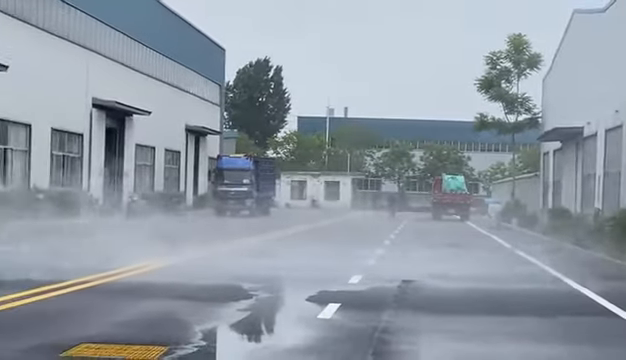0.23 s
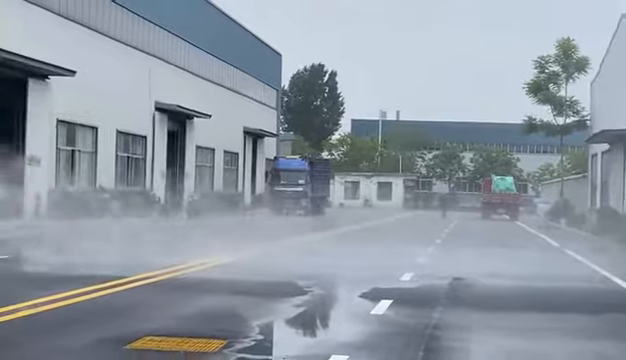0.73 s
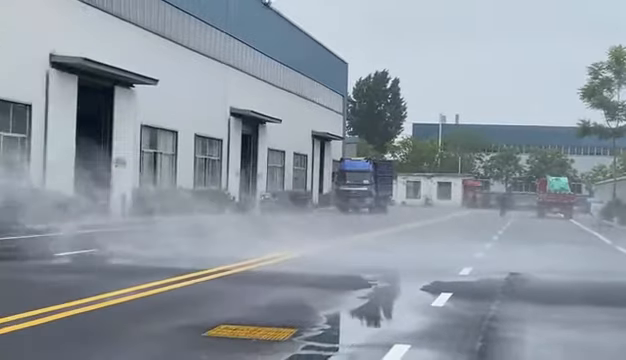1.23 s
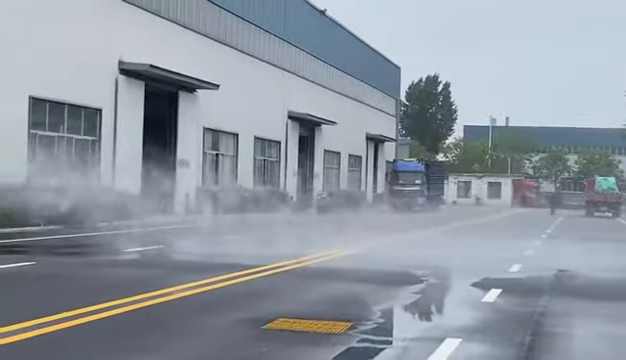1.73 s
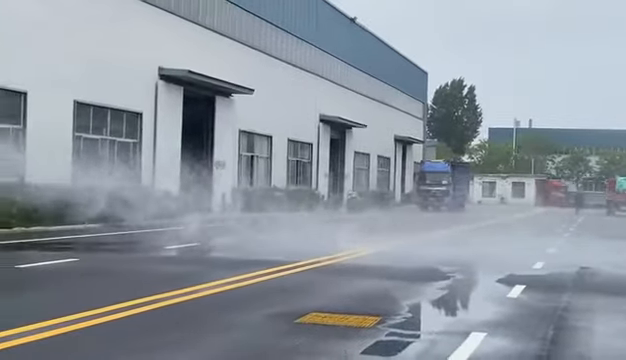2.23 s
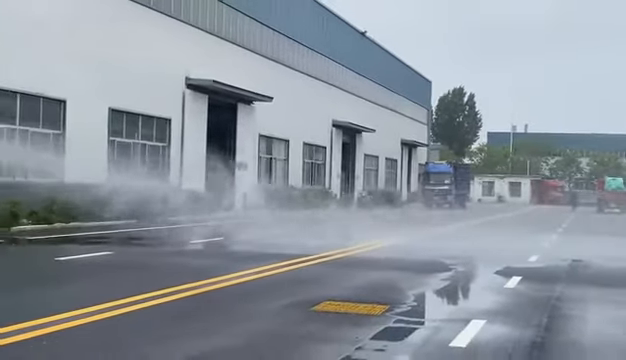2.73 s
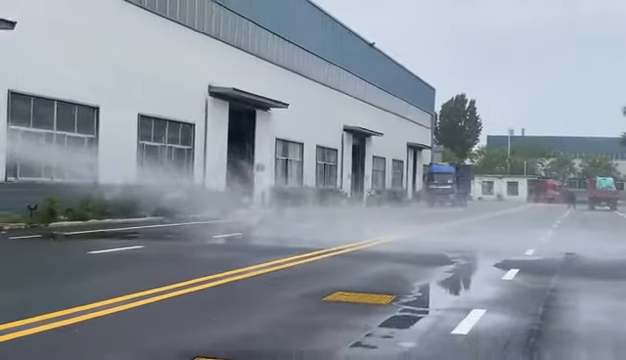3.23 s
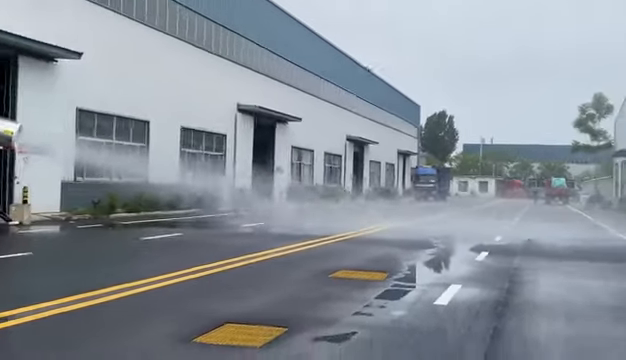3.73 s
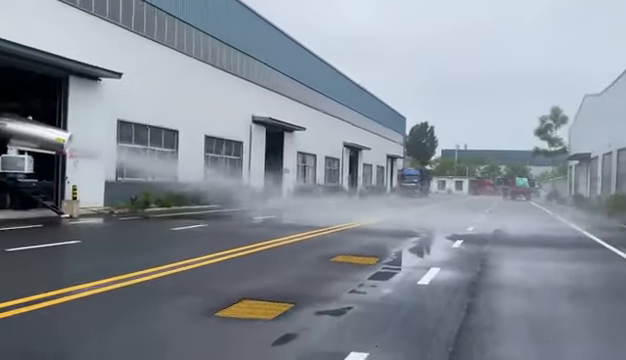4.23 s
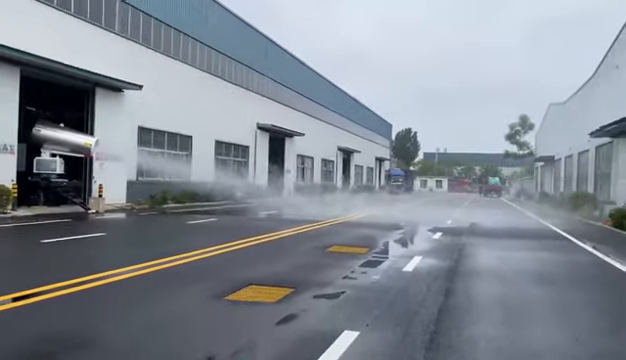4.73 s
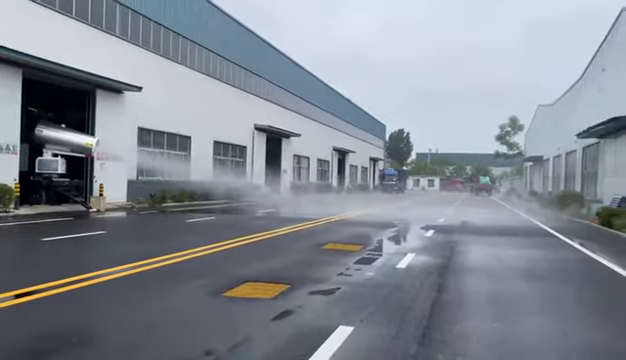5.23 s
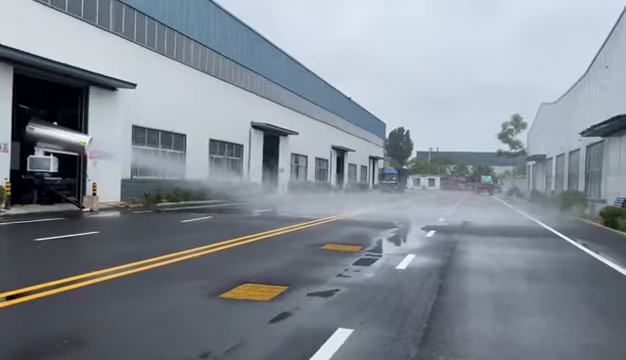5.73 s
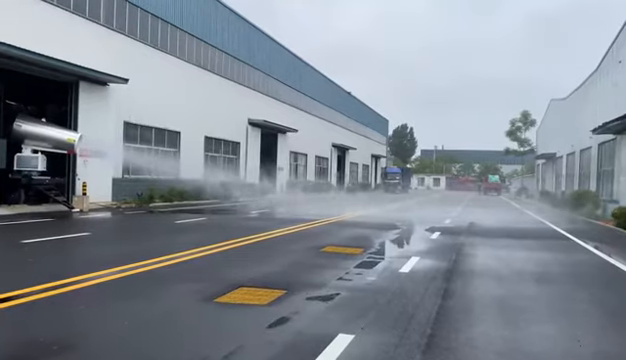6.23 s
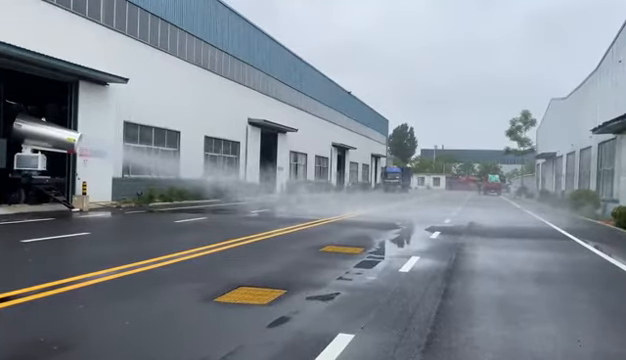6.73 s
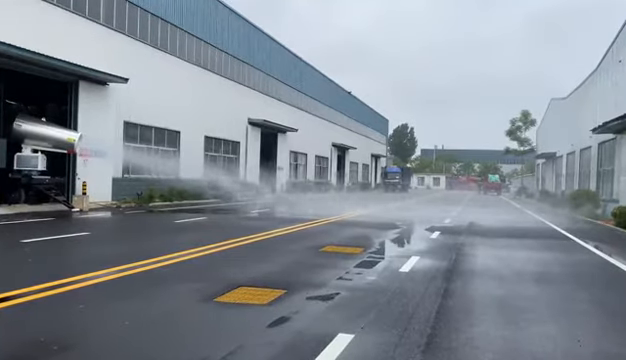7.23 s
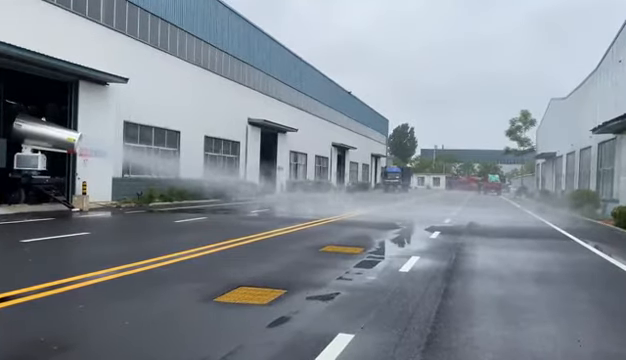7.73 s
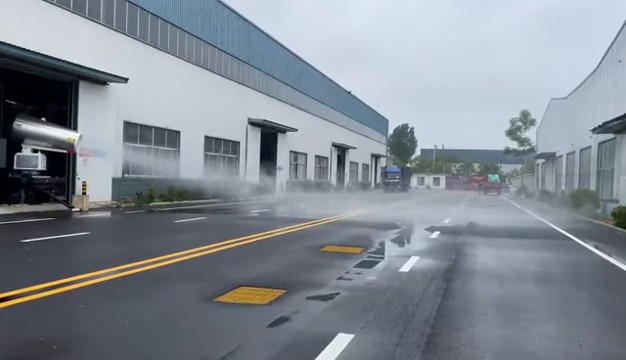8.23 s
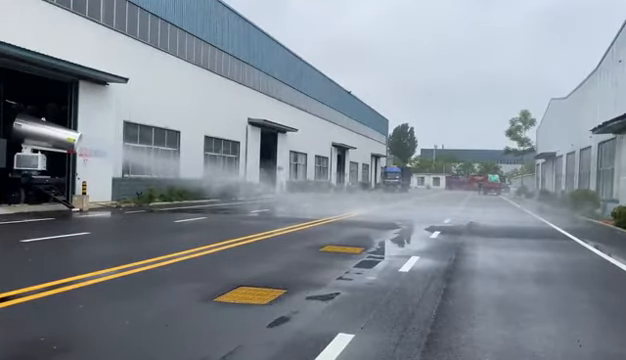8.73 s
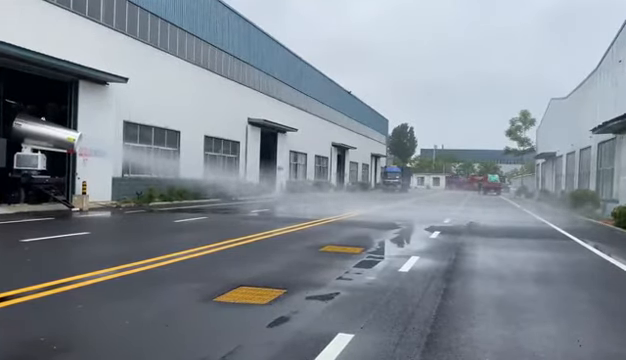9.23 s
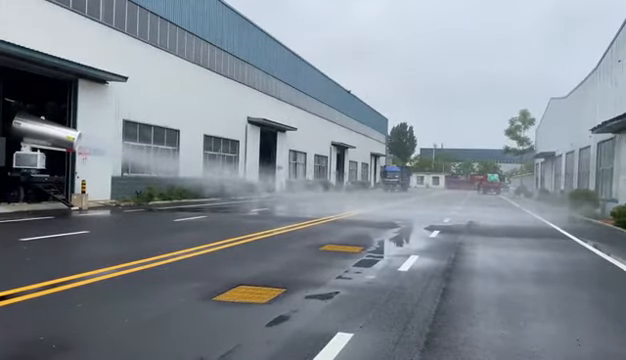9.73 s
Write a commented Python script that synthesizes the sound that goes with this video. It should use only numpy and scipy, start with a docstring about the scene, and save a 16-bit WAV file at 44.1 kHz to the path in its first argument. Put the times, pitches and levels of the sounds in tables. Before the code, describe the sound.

Constant low fan hum with rumbling casing and hissing spray outdoors, gusty breeze at first, faint high whine flickering, then a wider, brighter rush.

```python
"""A mist cannon runs in a workshop doorway and blows spray down a wet factory street.
Its fan hums as a blade tone with overtones over a rumble; shaped noise makes the air rush and nozzle hiss.
Steady tones make the drive's drone and a thin whine that comes and goes; low noise makes a gusty breeze.
Near four seconds the microphone turns toward the machine: the sound widens and the treble starts to
flicker, because the recorder's noise suppressor ducks weak patches."""
import sys
import numpy as np
from scipy import signal
from scipy.fft import irfft
from scipy.io import wavfile
from scipy.ndimage import uniform_filter1d

SR = 44100
rng = np.random.default_rng(int(sys.argv[2]) if len(sys.argv) > 2 else 0)


def to_wav(s):
    """Save 16-bit WAV."""
    ch = np.atleast_2d(s).T  # columns
    pcm = np.round(np.clip(ch, -1, 1) * 32767)  # PCM
    wavfile.write(sys.argv[1], SR, pcm.astype(np.int16))


N = 440559
T = np.arange(N) / SR  # time of each sample [s]
BINS = np.maximum(np.arange(N // 2 + 1) * SR / N, 1)  # frequencies of the whole-length spectrum [Hz]
SIDES = np.array([[1], [-1]])  # left, right

# Blade tone, which swells and fades on its way through moving air: (time [s], level [dB])
BLADE_LEVEL = [(0, -26.5), (.65, -28), (1.1, -28), (1.5, -23.5), (1.7, -35.5), (1.87, -31.5), (2.05, -30),
               (2.4, -18.5), (2.58, -24), (3.25, -22.5), (3.95, -27), (4.22, -23.5), (4.6, -26),
               (4.87, -22), (4.95, -40), (5.03, -22.5), (5.3, -32.5), (5.4, -27), (5.62, -34.5),
               (5.72, -29), (6.26, -26.5), (6.35, -37.5), (6.5, -23.5), (7.02, -46.5), (7.17, -25.5),
               (7.46, -25.5), (7.56, -33.5), (7.9, -30), (9.15, -37.5), (9.74, -33.5), (10, -27.5)]
# Other overtones of the blade rate: (multiple [count], level turned away [dB], gain from the front [dB],
# left lead turned away [rad], left lead from the front [rad], left minus right [dB])
BLADE_OVERTONES = [(2, -38, 3, 2.13, 2.5, -0.5), (3, -43, 2, 0.75, -1.5, -5), (4, -39.5, -2, 1.4, 3.5, 1.5),
                   (8, -51.5, 1, 2.7, 5.5, -2)]
# Fainter steady tones of the machinery: (frequency [Hz], level [dB])
MACHINE_TONES = [(230.1, -46.5), (263.7, -48.5), (592.2, -45.5), (5952.6, -64), (6209.6, -68.5),
                 (6725.1, -53.5)]
# Colours of the casing's rumble, the air rush and the nozzles' hiss: (frequency [Hz], relative level [dB])
RUMBLE_COLOUR = [(20, -24), (45, -17.5), (75, -3), (110, -6), (126, -3.5), (150, 0.5), (195, 0),
                 (212, -3.5), (235, 0), (252, -1.5), (275, 1.3), (305, -8), (335, -3), (380, -18.5),
                 (600, -28)]
RUSH_COLOUR = [(250, -19), (380, -1.5), (450, 0.5), (520, 3.5), (570, -2.5), (720, -4.5), (920, -5),
               (1100, -3), (1550, -5.5), (1950, -7), (2250, -12), (3300, -41)]
HISS_COLOUR = [(1700, -10), (2500, 0.5), (3100, 0.5), (4050, -0.5), (4450, -3.5), (5200, -2), (6300, -1.5),
               (7500, -5.5)]
# Brief surges of the spray: (time [s], half width [s], rise [dB])
SPRAY_SURGES = [(0.1, 0.26, 1), (5.659, 0.31, 1), (6.503, 0.27, 1), (7.76, 0.23, 1.5), (8.061, 0.22, 0.3),
                (8.79, 0.098, 0.3)]
# Brief dips of the hiss: (time [s], half width [s])
HISS_DIPS = [(4.39, 0.0097), (4.757, .018), (4.855, 0.0089), (5.229, 0.017), (5.387, 0.017), (5.479, 0.011),
             (5.644, 0.014), (6.389, 0.013), (6.634, 0.0067), (7.153, 0.0077), (7.474, 0.0077),
             (7.888, 0.019), (8.182, 0.015), (8.904, 0.017), (9.166, 0.018), (9.31, 0.014), (9.52, .014),
             (9.66, 0.014)]
# Bursts of the thin whine: (start [s], end [s], level turned away [dB])
WHINE_BURSTS = [(2.1, 2.15, -43), (2.33, 2.42, -48), (2.54, 2.64, -45), (2.68, 2.82, -40.5),
                (2.91, 2.97, -38), (2.97, 3.21, -40.5), (3.27, 3.31, -41), (3.38, 3.56, -39.5),
                (3.56, 3.68, -47), (4.8, 5.0, -51), (6.35, 6.68, -50), (6.68, 6.85, -45.5), (7.2, 7.5, -49)]
# Gusts of the breeze: (time [s], half width [s], rise [dB])
BREEZE_GUSTS = [(.04, 0.022, 4.5), (.22, 0.027, 5.5), (.54, .025, 3.5), (.69, .04, 4), (0.919, 0.033, 10.5),
                (1.081, 0.039, 7), (1.4, .1, 1), (1.56, 0.019, 5.5), (1.67, .045, 9.5), (1.771, 0.069, 4)]
# How far the microphone faces the machine: (time [s], share [0-1])
MIC_TURN = [(3.55, 0), (4.2, 1)]
# The two microphone ports, turned away from, nearly toward and squarely toward the machine:
# (frequency [Hz], likeness of the ports [0-1], left lead [rad], left minus right [dB])
VIEW_AWAY = [(50, .8, 0, 0), (130, .91, 0, .4), (280, .94, 0, -.6), (430, .7, .3, 1.4), (590, .78, 0, 1),
             (750, .5, -.2, -.4), (920, .65, .2, .5), (1200, .47, .9, 2.6), (1550, .6, .7, 1.8),
             (2000, .49, 2, -2.2), (2650, .55, .7, 2.2), (3100, .88, 0, .3), (3800, .94, 0, 0),
             (4400, .64, .1, 0), (5400, .8, 0, 0)]
VIEW_ANGLED = [(280, .85, 0, -.6), (450, .3, .6, 2), (600, .42, -.3, 1.8), (720, .12, -.5, .4),
               (930, .2, 1.5, 1.2), (1100, .4, 2.2, 2), (1280, .15, 1.6, 4.4), (1430, .5, .2, 3),
               (1600, .45, .7, 2.6), (1800, .6, 2.7, 0), (2000, .3, 2.4, 0), (2500, .5, 2.7, -1)]
VIEW_FACING = [(50, .7, 0, 0), (140, .85, -.2, .5), (280, .82, 0, -.6), (450, .45, .3, 2),
               (570, .38, 0, 1.8), (720, .1, .5, .4), (830, .35, 3, .8), (900, .75, 3.1, .6),
               (970, .77, 3.1, .8), (1130, .34, 2.2, 3), (1250, .38, 2.5, 4.4), (1550, .38, 2, 2.6),
               (1780, .5, 2.7, 1), (2000, .55, 3, 0), (2370, .2, 2.5, -.5), (2600, .45, 2.3, -1.1),
               (2850, .45, 3.1, -1), (3150, .2, 1.8, 0), (3500, .14, 1.9, 0), (4500, .27, 4.4, 1.1),
               (5400, .2, 3.8, 1.5), (6500, .37, 6, .2), (7200, .28, 5.1, .3)]
# Change of noise colour when nearly and when squarely facing the machine: (frequency [Hz], lift [dB])
ANGLED_LIFT = [(150, 1), (250, 0), (350, 2), (500, -0.5), (720, 2.5), (1200, 4.5), (2000, 3)]
FACING_LIFT = [(80, 0.5), (180, -0.5), (270, -2), (360, 0.5), (530, 1.9), (720, 4.5), (930, 5.5),
               (1200, 3.5), (2000, 3), (3700, 1), (4450, 2), (5300, 0), (7000, 1)]
# Deepest narrow cut of the noise suppressor, at its full bite: (frequency [Hz], cut [dB])
SUPPRESSOR_CUT = [(450, 0), (750, 9), (870, 58), (980, 58), (1100, 17), (1500, 22), (2050, 56), (3000, 36),
                  (4200, 25), (7000, 15)]

BLADE_HZ, DRIVE_HZ, WHINE_HZ = 257.5, 131.8, 5437

# One overtone stands out as a clear note and swells once.
NOTE_MULTIPLE = 6
NOTE_DB, NOTE_SWELL_DB, NOTE_SWELL_S, NOTE_WIDTH_S = -40, 3.5, 5.1, 1
# A second, small turn settles the microphone: the note shifts left and the rush turns hollow.
SETTLE_S, SETTLE_LENGTH_S = 5.8, 0.27
NOTE_LEAD_RAD, NOTE_PAN_DB = 0.93, -2  # before that turn
NOTE_SHIFT_RAD, NOTE_SHIFT_DB = 0.57, 8

# Jet: levels turned away, gains from the front, and the spread and speed of quick wavering.
RUSH_DB, RUSH_FRONT_DB = -27, 1.43
HISS_DB, HISS_FRONT_DB = -31.5, 2.16
FLUTTER_DB, FLUTTER_PER_S = 0.36, 27
SPUTTER_DB, SPUTTER_PER_S = 0.21, 16.3  # of the hiss, heard from the front
DIP_DB = -1
SAG_S, SAG_WIDTH_S, SAG_DB = 3.75, 0.29, -1  # the hiss also sags a little early in the turn

# Whine: the faint level between bursts, and a slight drop from the front.
WHINE_DB, WHINE_FRONT_DB = -57, -0.5
WHINE_LEAD_RAD, WHINE_PAN_DB = 0.56, 6.5  # toward the left, heard from the front
WHINE_EDGE_S = 0.015  # how long a burst takes to cut in or out

BREEZE_DB, BREEZE_DROPS_S, BREEZE_FALL_DB_PER_S, LULL_DB = -29.5, 1.7, 14, -43.5

TOP_HZ = 7640  # the recorder keeps nothing much above this


def fan(facing, settled):
    """Turning blades beat the air into a tone with overtones, one a clear note, and the casing rumbles."""
    lead, pan_db = place(BLADE_HZ, facing)
    hum = undb(curve(BLADE_LEVEL)[0]) * tone(BLADE_HZ, lead, pan_db, scatter=0.026, rate=2.3)

    overtones = 0
    for multiple, db, front_db, lead_away, lead_front, pan_db in BLADE_OVERTONES:
        lead = lead_away + facing * (lead_front - lead_away)
        overtone = tone(round(multiple) * BLADE_HZ, lead, pan_db, scatter=0.57, rate=7)
        overtones = overtones + undb(db + front_db * facing) * overtone

    note_db = NOTE_DB + NOTE_SWELL_DB * swell(NOTE_SWELL_S, NOTE_WIDTH_S)
    note_lead = NOTE_LEAD_RAD + NOTE_SHIFT_RAD * settled
    note_pan_db = NOTE_PAN_DB + NOTE_SHIFT_DB * settled
    note = undb(note_db) * tone(NOTE_MULTIPLE * BLADE_HZ, note_lead, note_pan_db, scatter=0.21, rate=26)

    rumble = undb(-26.0 + .5 * walk(1.2)) * air(RUMBLE_COLOUR, turning(facing, settled))
    return hum + overtones + note + rumble


def jet(facing, settled):
    """Air rushes from the barrel and carries the hiss of water atomised by the nozzles."""
    rush_db = RUSH_DB + RUSH_FRONT_DB * facing + FLUTTER_DB * walk(FLUTTER_PER_S)
    rush = undb(rush_db) * air(RUSH_COLOUR, turning(facing, settled))

    surge_db = sum(db * swell(s, width) for s, width, db in SPRAY_SURGES)
    dip_db = DIP_DB * sum(swell(s, width) for s, width in HISS_DIPS)
    sag_db = SAG_DB * swell(SAG_S, SAG_WIDTH_S)
    front_db = HISS_FRONT_DB + SPUTTER_DB * walk(SPUTTER_PER_S)
    hiss_db = HISS_DB + front_db * facing + surge_db + dip_db + sag_db
    hiss = undb(hiss_db) * air(HISS_COLOUR, [(VIEW_FACING, FACING_LIFT, facing)])
    return rush + hiss


def drive(facing):
    """The drive's even drone, the high whine that cuts in and out, and fainter machinery tones."""
    drone = undb(-30.5) * tone(DRIVE_HZ, *place(DRIVE_HZ, facing), scatter=0.055, rate=6.9)

    bursts = 0
    for start, end, db in WHINE_BURSTS:
        inside_s = np.minimum(T - start, end - T)  # time to the nearer edge, negative outside
        bursts = bursts + undb(db) * np.clip(inside_s / WHINE_EDGE_S + .5, 0, 1)
    strength = np.maximum(bursts, undb(WHINE_DB)) * undb(WHINE_FRONT_DB * facing)
    whine = strength * tone(WHINE_HZ, WHINE_LEAD_RAD * facing, WHINE_PAN_DB * facing, scatter=0.29, rate=25)

    singing = sum(undb(db) * tone(hz, *place(hz, facing), scatter=0.78, rate=1.6) for hz, db in MACHINE_TONES)
    return drone + whine + singing


def breeze():
    """Eddies at the microphone make a low, uneven buffeting that gusts and then drops to a lull."""
    eddies = ports(colour([(35, -23.5), (70, -3.5), (120, 0.5), (180, -4.5), (280, -20.0)]), VIEW_AWAY)
    falling_s = np.maximum(T - BREEZE_DROPS_S, 0)
    wind_db = np.maximum(BREEZE_DB - BREEZE_FALL_DB_PER_S * falling_s, LULL_DB)
    gust_db = sum(db * swell(s, width) for s, width, db in BREEZE_GUSTS)
    return undb(wind_db + gust_db + 1.2 * walk(6.7)) * eddies


def tone(hz, lead, pan_db, scatter, rate):
    """A steady tone of rms 1 plus its wall reflections, which fade at random in the moving air."""
    shared = walk(rate) + 1j * walk(rate)
    apart = walk(rate) + 1j * walk(rate)
    direct = undb(SIDES * pan_db / 2) * np.exp(.5j * SIDES * lead)
    # the shorter the wave, the more the reflections differ between the ports
    paths = direct * (1 + scatter * shared) + .5 * scatter * min(hz / 800, 1) * SIDES * apart
    y = np.real(paths * np.exp(2j * np.pi * hz * T))
    return y / y.std()


def air(spectrum, fronts):
    """Turbulent noise that crosses from the side view to front views, each with its lift and share."""
    gain = colour(spectrum)
    away = np.maximum(1 - sum(share for _, _, share in fronts), 0)
    sound = np.sqrt(away) * ports(gain, VIEW_AWAY)
    for view, lift, share in fronts:
        lifted = gain * undb(across(lift, BINS)[0])
        sound = sound + np.sqrt(share) * ports(lifted, view)
    return sound


def ports(gain, view):
    """Noise of rms 1 at two ports: partly shared, shifted in phase and shaded by the housing."""
    likeness, lead, pan_db = across(view, BINS)
    likeness = np.clip(likeness, 0, 1)
    mid, side = rng.standard_normal((2, len(BINS))) + 1j * rng.standard_normal((2, len(BINS)))
    pair = np.sqrt(1 + likeness) * mid + SIDES * np.sqrt(1 - likeness) * side
    y = irfft(pair * gain * undb(SIDES * pan_db / 2) * np.exp(.5j * SIDES * lead), N)
    return y / y.std()


def place(hz, facing):
    """Left lead [rad] and left minus right [dB] of a tone as the microphone turns."""
    _, lead_away, pan_away = across(VIEW_AWAY, hz)
    _, lead_front, pan_front = across(VIEW_FACING, hz)
    return lead_away + facing * (lead_front - lead_away), pan_away + facing * (pan_front - pan_away)


def turning(facing, settled):
    """The two front views: nearly toward the machine at first, then squarely toward it."""
    return [(VIEW_ANGLED, ANGLED_LIFT, facing * (1 - settled)), (VIEW_FACING, FACING_LIFT, facing * settled)]


def settling(s):
    """How far the second, small turn has gone at time s, from 0 to 1."""
    return np.clip((s - SETTLE_S) / SETTLE_LENGTH_S, 0, 1)


def colour(spectrum):
    """Gain per frequency bin; it falls steeply beyond both ends of the spectrum."""
    ends = np.minimum(BINS / spectrum[0][0], 1) * np.minimum(spectrum[-1][0] / BINS, 1)
    return undb(across(spectrum, BINS)[0]) * ends ** 4


def walk(rate):
    """Smooth chance with spread 1 that moves up to about rate times a second."""
    slow = BINS[BINS < 80]
    real, imag = rng.standard_normal((2, len(slow)))
    y = irfft((real + 1j * imag) / (1 + (slow / rate) ** 4), N)
    return y / y.std()


def swell(centre, width):
    """A bell-shaped rise and fall of height 1, down to about a third one width from its centre."""
    return np.exp(-((T - centre) / width) ** 2)


def curve(rows):
    """The columns of a time table, joined by straight lines."""
    s, *columns = np.transpose(rows)
    return [np.interp(T, s, c) for c in columns]


def across(rows, hz):
    """The columns of a frequency table, read at hz on a log axis."""
    points, *columns = np.transpose(rows)
    return [np.interp(np.log(hz), np.log(points), c) for c in columns]


def undb(db):
    """Decibels to gain."""
    return 10 ** (np.asarray(db) / 20)


def shortfall(power, threshold, size):
    """How far each band sinks under its average over the half second around, in spreads past a threshold."""
    patch = np.log(np.maximum(uniform_filter1d(power, size, axis=-1), 1e-16))  # smoothed over size frames
    below = uniform_filter1d(patch, size=90, axis=-1) - patch
    return np.maximum(below / (below.std(axis=-1, keepdims=True) + 1e-9) - threshold, 0)


def suppress(x, away_share, side_share, broad_db, threshold):
    """A noise suppressor ducks weak bands, so the spray turns watery; it bites harder toward the machine."""
    # work on the ports' sum and difference
    hz, s, z = signal.stft(x[0] + SIDES * x[1], SR, nperseg=1024, noverlap=768, boundary="even")
    facing = np.interp(s, T, curve(MIC_TURN)[0])
    bite = away_share + (1 - away_share) * facing * (3 + settling(s)) / 4
    power = np.abs(z) ** 2

    # bands are about 100 Hz wide in the middle range and widen toward the treble
    band_number = np.floor(28 * np.log1p(hz / 2000))
    _, edges, band = np.unique(band_number, return_index=True, return_inverse=True)

    # narrow gaps open mostly in the sum
    band_power = np.add.reduceat(power, edges, axis=1)
    narrow = np.tanh(shortfall(band_power, threshold, size=7))[:, band]
    sum_and_difference = np.array([1, side_share])[:, None, None]
    narrow_db = across(SUPPRESSOR_CUT, hz + 1)[0][:, None] * bite * narrow * sum_and_difference

    # brief broad gaps take the treble of both
    broad_power = uniform_filter1d(power.mean(axis=0), size=56, axis=0)
    wide = shortfall(broad_power, threshold, size=1)
    wide_db = broad_db * bite * wide * np.minimum(hz / 3000, 1)[:, None] ** 2

    ducked = z * undb(-narrow_db - wide_db)
    mid, side = signal.istft(ducked, SR, nperseg=1024, noverlap=768)[1][:, :N]
    return (mid + SIDES * side) / 2


def scene():
    """Machine, jet and breeze at the turning microphone."""
    facing = np.clip(curve(MIC_TURN)[0], 0, 1)
    settled = settling(T)
    return fan(facing, settled) + jet(facing, settled) + drive(facing) + breeze()


def record(dry):
    """The recorder suppresses noise and cuts the top steeply."""
    thinned = suppress(dry, away_share=0.15, side_share=.28, broad_db=10, threshold=.62)
    top_cut = signal.ellip(14, .1, 90, TOP_HZ, fs=SR, output="sos")
    return signal.sosfilt(top_cut, thinned)


dry = scene()
out = record(dry)
to_wav(out)
```